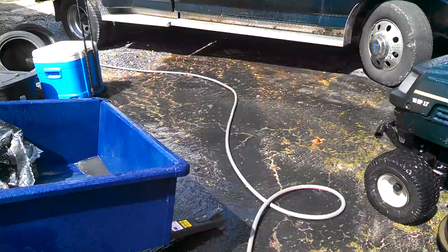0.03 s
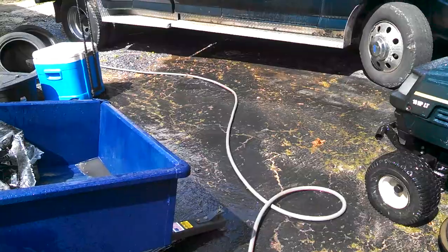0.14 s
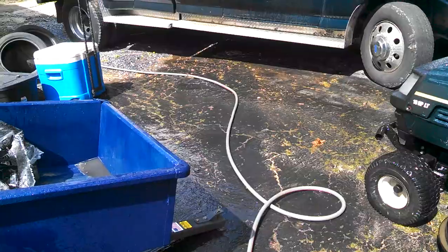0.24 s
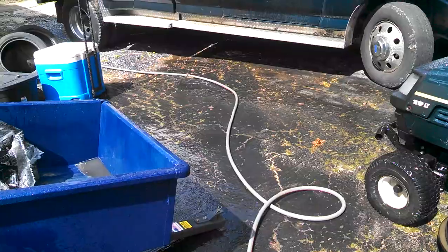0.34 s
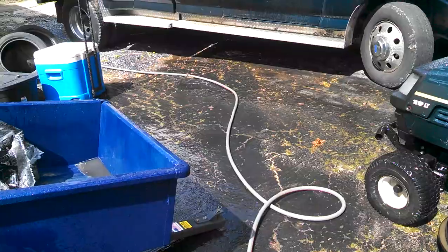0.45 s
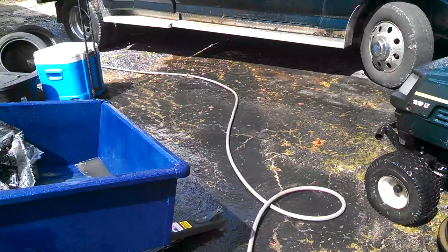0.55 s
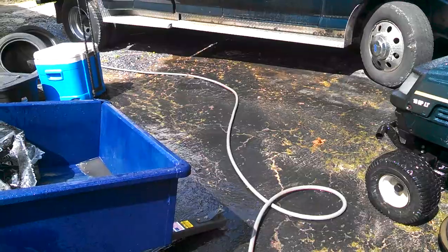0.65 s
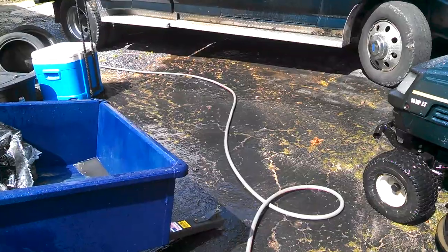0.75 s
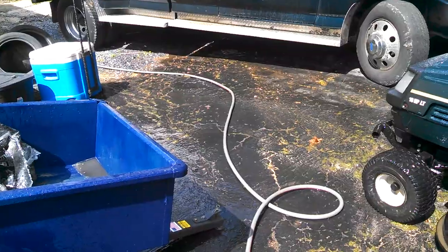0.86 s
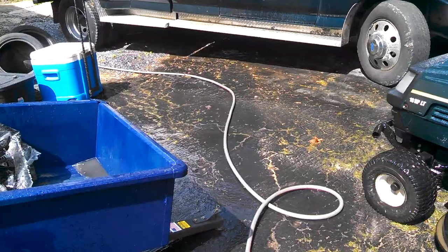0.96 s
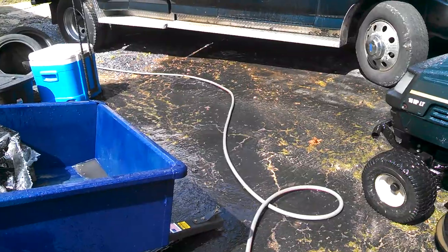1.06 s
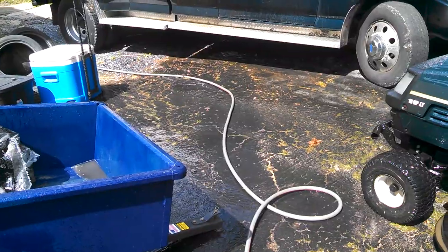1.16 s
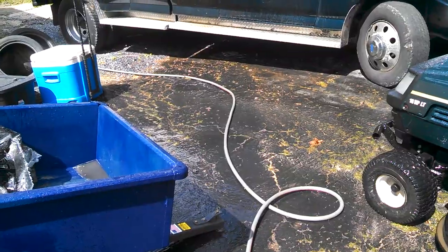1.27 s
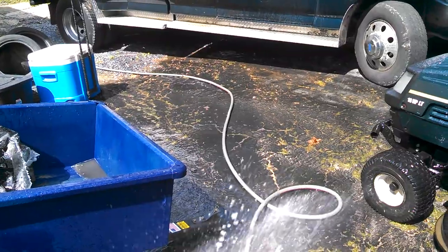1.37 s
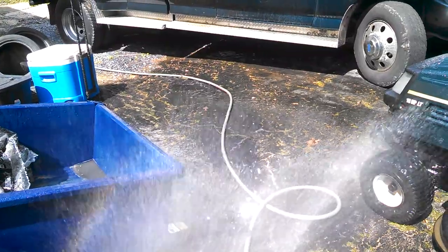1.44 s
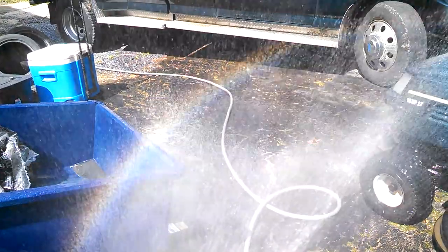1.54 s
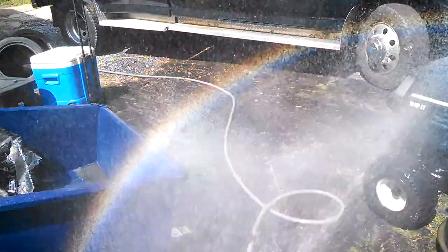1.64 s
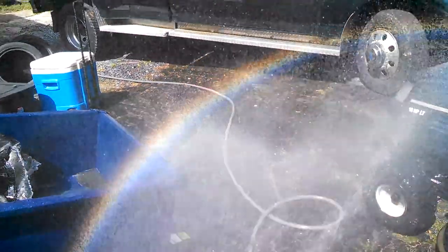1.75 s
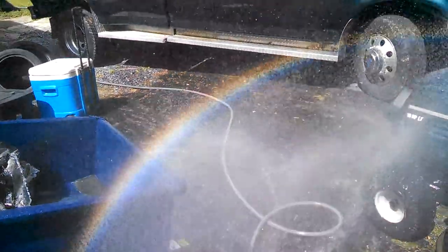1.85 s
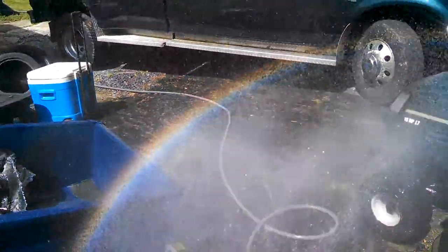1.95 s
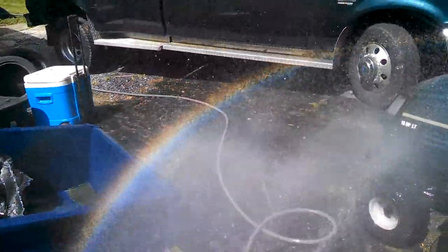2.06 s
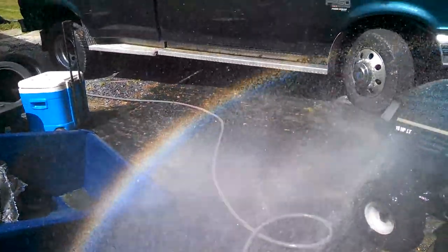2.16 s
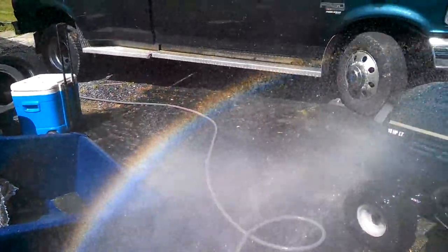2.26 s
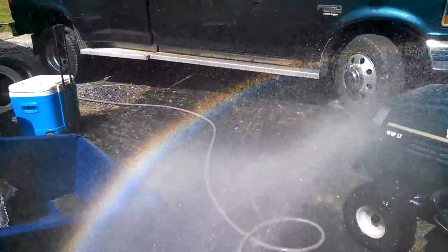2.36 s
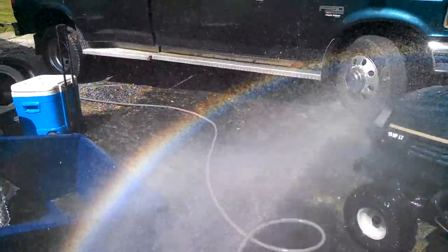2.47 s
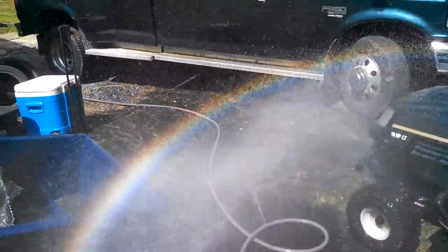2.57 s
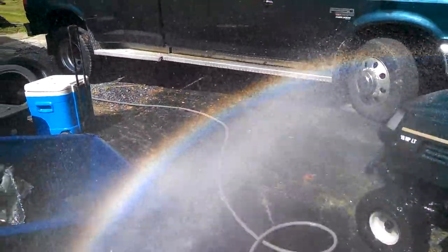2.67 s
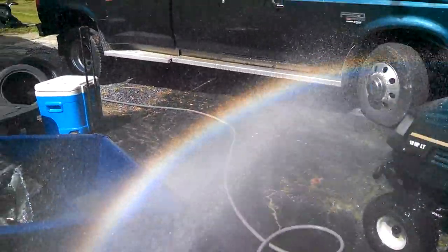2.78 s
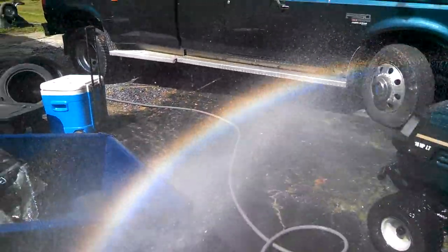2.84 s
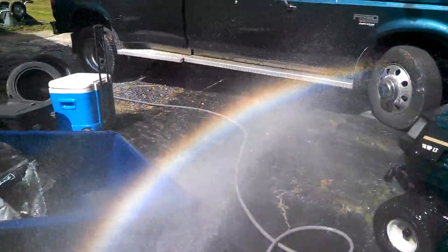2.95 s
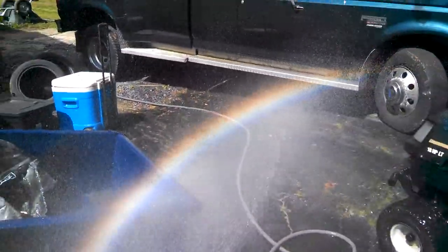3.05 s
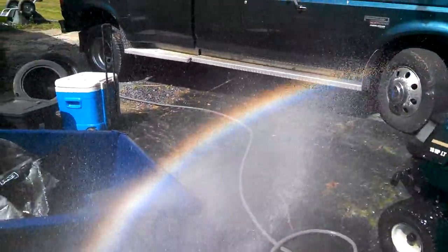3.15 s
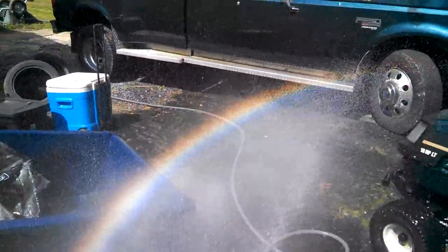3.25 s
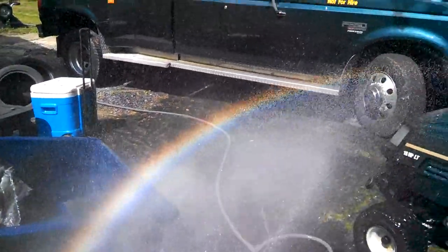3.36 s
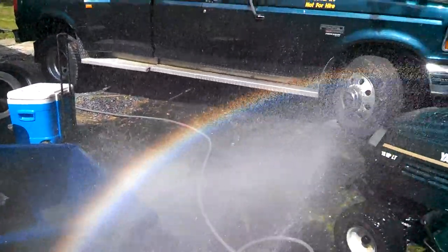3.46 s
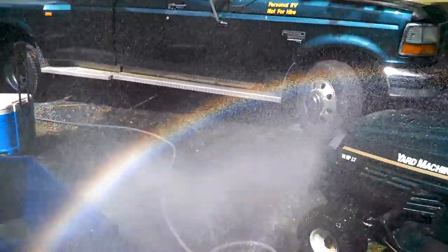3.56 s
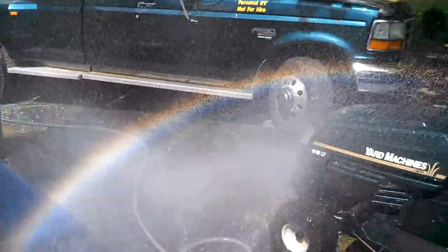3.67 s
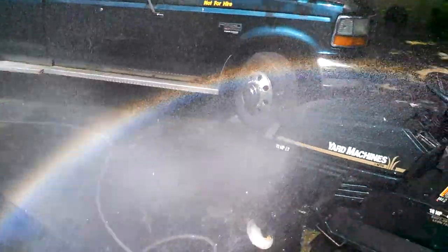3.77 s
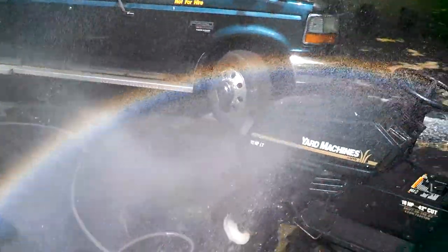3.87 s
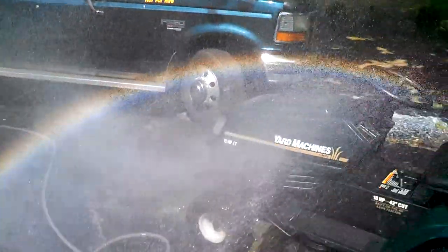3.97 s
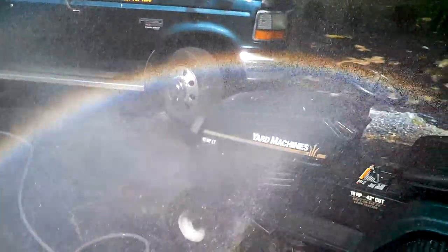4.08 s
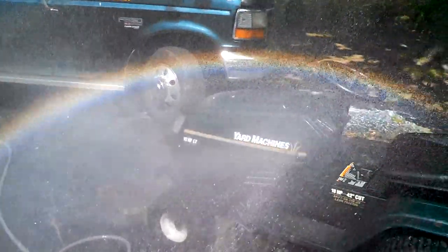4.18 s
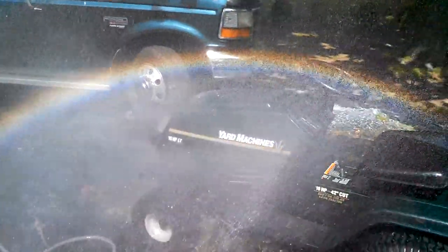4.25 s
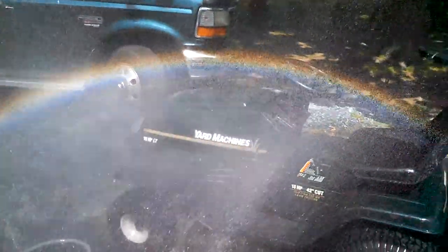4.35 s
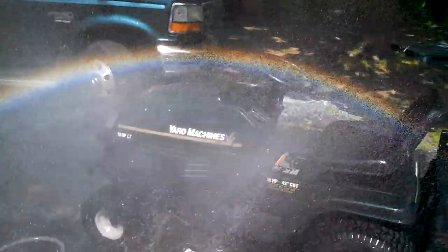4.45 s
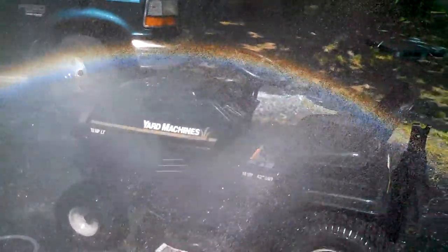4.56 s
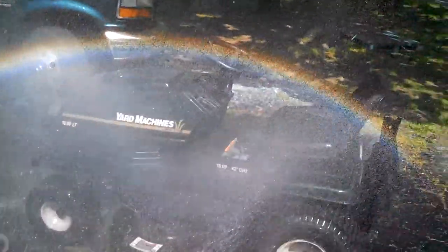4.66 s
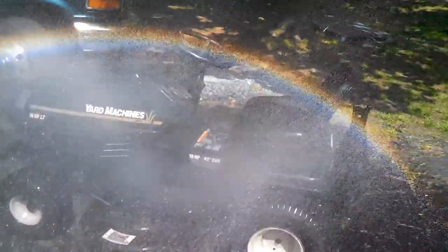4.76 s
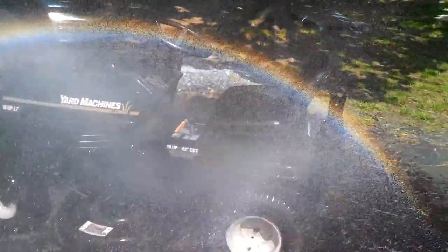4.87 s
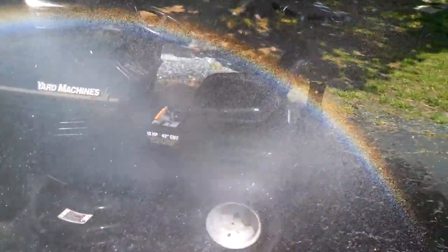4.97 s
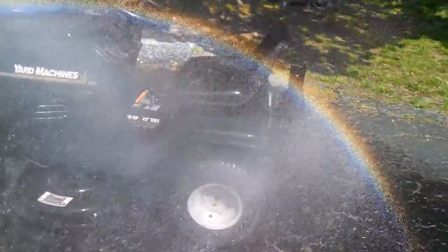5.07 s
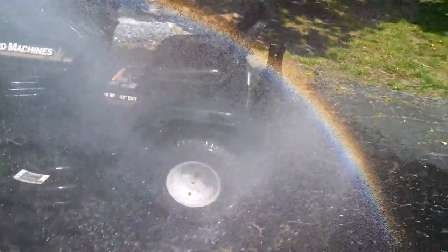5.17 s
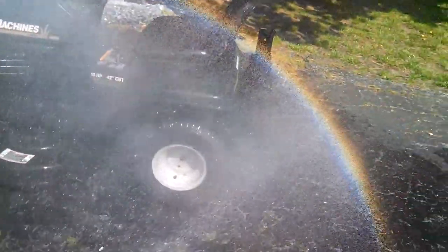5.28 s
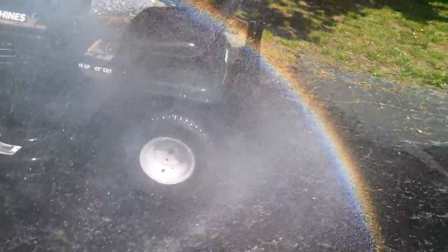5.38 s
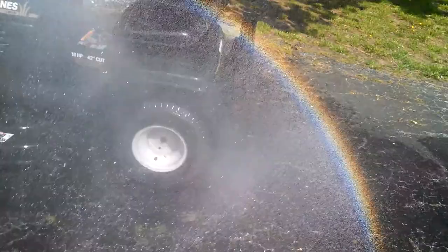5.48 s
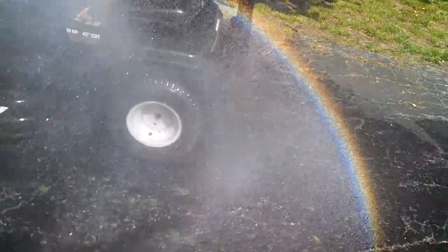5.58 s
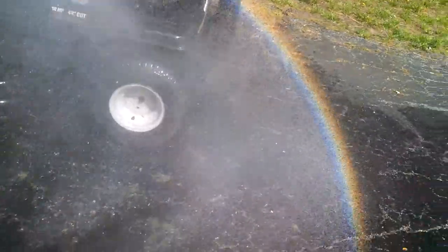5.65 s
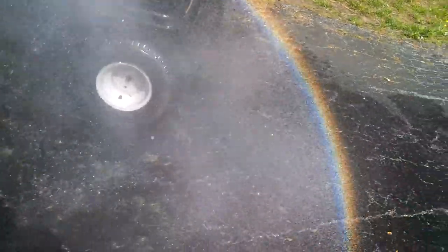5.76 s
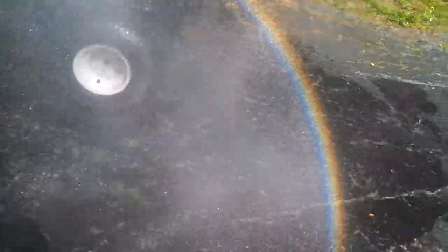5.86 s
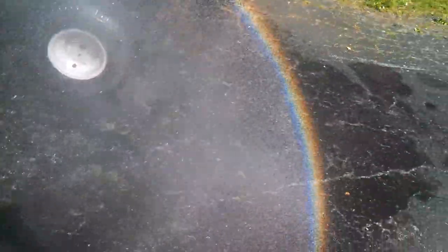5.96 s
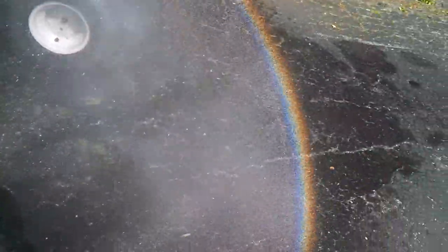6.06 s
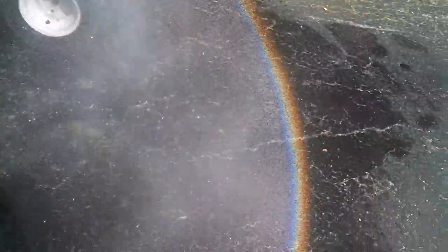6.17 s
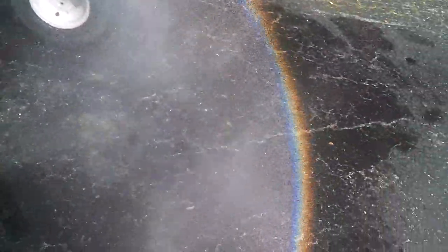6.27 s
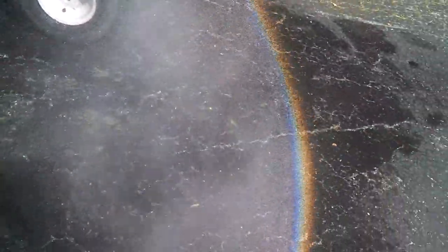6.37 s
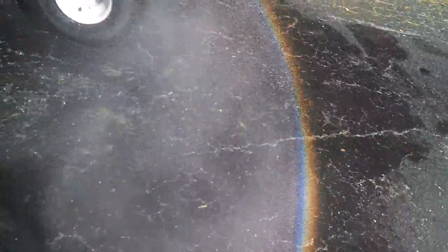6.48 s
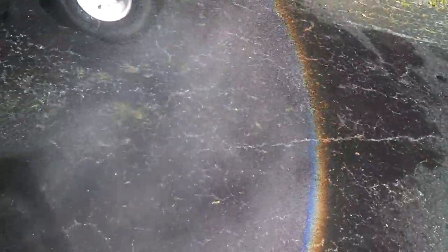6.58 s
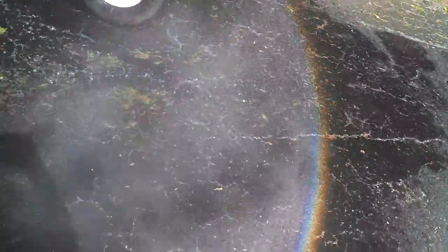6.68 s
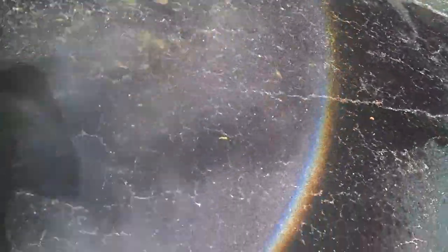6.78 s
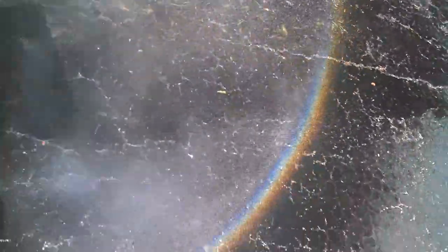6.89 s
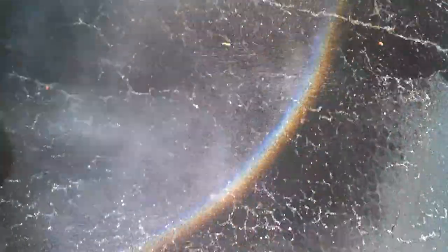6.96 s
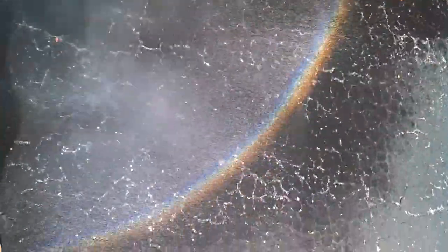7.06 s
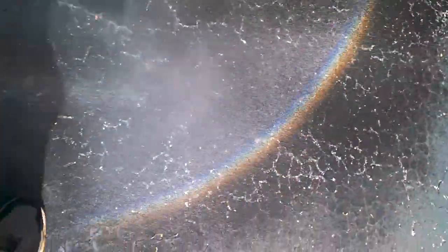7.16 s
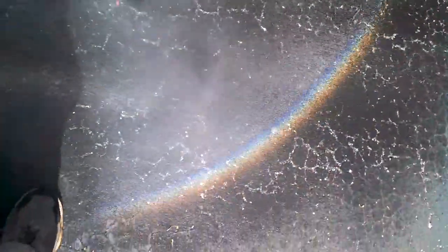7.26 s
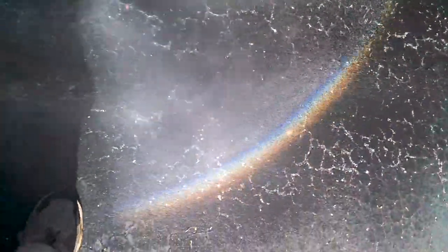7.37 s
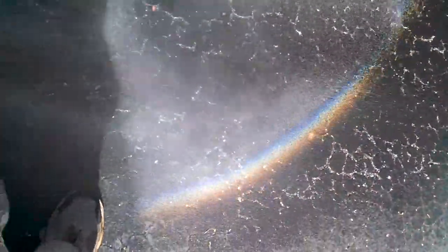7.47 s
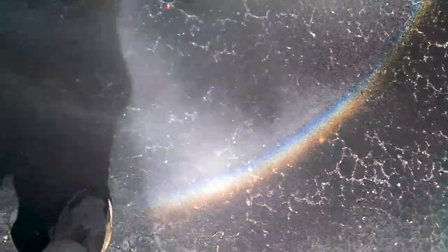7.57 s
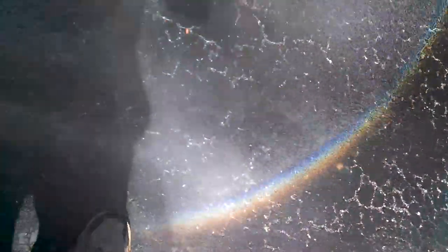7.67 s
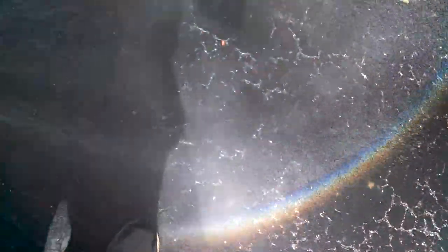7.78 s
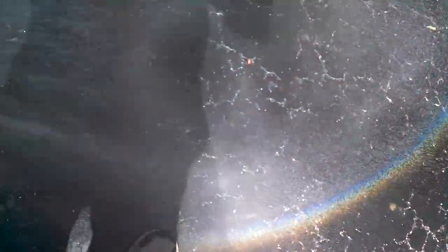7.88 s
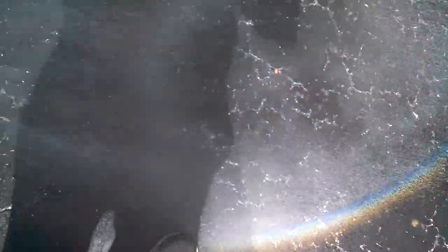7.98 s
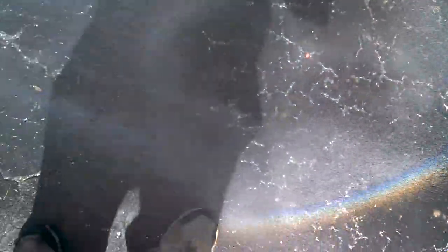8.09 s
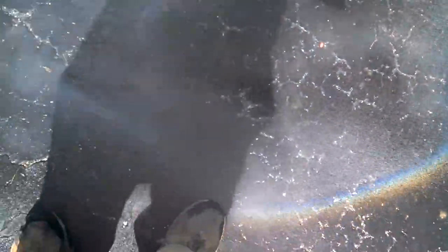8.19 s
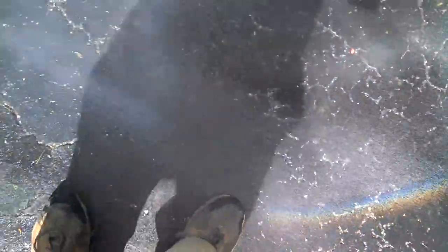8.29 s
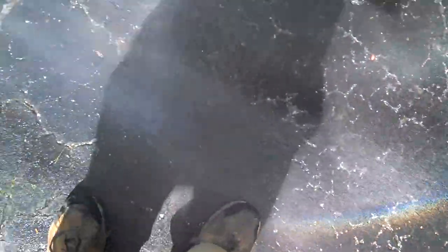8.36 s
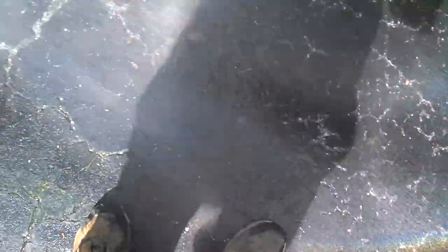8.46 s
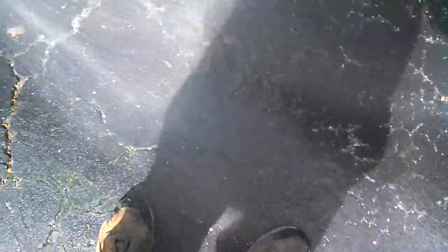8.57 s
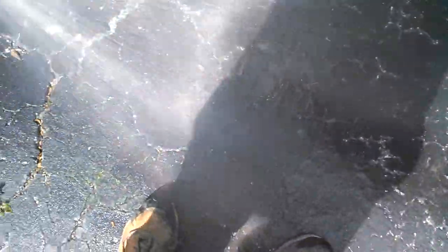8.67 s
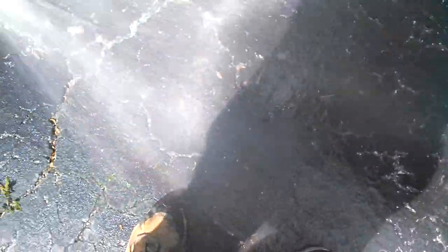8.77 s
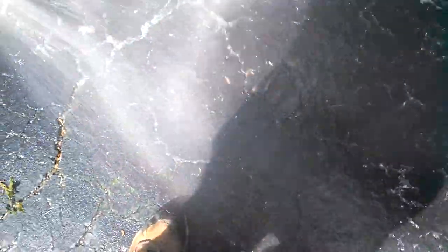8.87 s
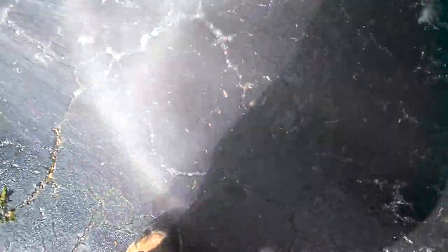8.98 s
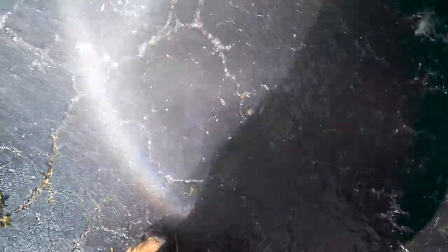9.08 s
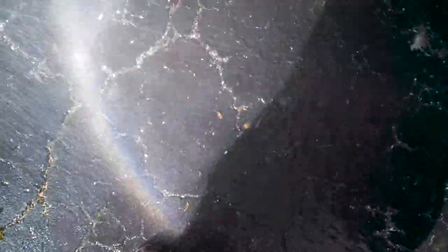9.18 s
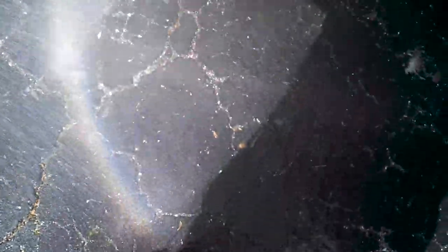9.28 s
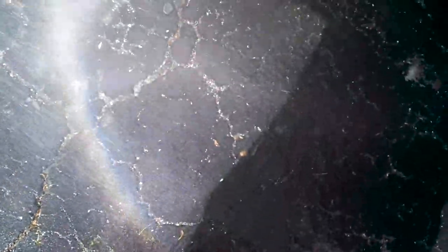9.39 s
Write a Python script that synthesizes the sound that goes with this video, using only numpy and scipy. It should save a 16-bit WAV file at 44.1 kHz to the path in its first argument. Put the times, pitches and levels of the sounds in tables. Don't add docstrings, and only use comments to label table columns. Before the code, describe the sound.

The first 0.8 seconds are silent. Then a faint outdoor rumble fades in quickly, with a low distant motor hum and a thin, very high electrical whine. Between about 0.85 and 1.25 seconds a distant bird gives several short, soft gliding whistles, slightly to one side. Near 1.38 seconds a hose valve sputters and chatters, jumps in strength at 1.44, and is fully open by 1.55. A close, broad water spray takes over: bright misty hiss, a lower rushing roar and drops pattering on wet asphalt. Automatic gain pulls it down around 1.7 to 1.9 seconds, then it climbs back by about 3. The spray continues steadily to the end near 9.4 seconds, with brief heavier gushes around 3.7, 5.2, 6 and 8 seconds, small level dips, and wide stereo colouring that shifts as the handheld camera turns.

```python
import sys
import numpy as np
from scipy import signal
from scipy.fft import rfft, irfft, next_fast_len
from scipy.io import wavfile
from scipy.ndimage import uniform_filter1d, map_coordinates

SR = 44100
rng = np.random.default_rng(int(sys.argv[2]) if len(sys.argv) > 2 else 0)


def volts_from_decibels(level):
    exponent = np.asarray(level, float) / 20
    return 10 ** exponent


def store_wav(level_fs):
    pcm = np.round(np.clip(np.atleast_2d(level_fs), -1, 1) * 32767)
    wavfile.write(sys.argv[1], SR, pcm.T.astype(np.int16))


N = 415863
T = np.arange(N) / SR
WIDEN_LAG = 16


def spray():
    # frequency in Hz, level in dB per Hz.
    roar_colour = [(25, 2), (50, -3), (95, 0), (200, -1), (400, 1), (600, -8), (900, -69), (1500, -120)]
    patter_colour = [(250, -120), (450, -4.5), (700, 0.5), (1000, 0.5), (1400, -0.5), (2000, 2),
                     (2800, 4.5), (3300, -1), (4000, -54), (5000, -120)]
    hiss_colour = [(1500, -120), (2200, -63), (3000, -6), (4000, -2.5), (5200, -1.5), (6800, -2.5),
                   (8300, -3.5), (10500, -20), (14000, -120)]
    mist_colour = [(5000, -120), (7000, 9), (8500, 0), (10000, 1.5), (12000, 0), (14000, 0.5),
                   (15500, -1.5)]
    # frequency in Hz, level against the near port in dB,
    # likeness to the near port from 0 to 1, phase lead in radians.
    far_port = [(50, 0, 0.92, .15), (100, -4, 0.98, 0.3), (260, -2, 0.85, 0.45), (405, -3.5, 1, 0.24),
                (620, -6.5, 0.77, 0.034), (960, -6.5, 1, 0.51), (1370, -5, 0.68, 0.51),
                (2150, -5.5, 0.72, 0.54), (3440, -1.5, 0.05, -0.14), (7900, -5, 0, 0.03),
                (15400, -4, 0.34, 0.062)]
    # time in seconds, far port's delay in ms,
    # directness of the far port's copy in dB, facing the jet in dB.
    turning = [(0, 0.34, -1.5, -2), (1.4, 0.29, -2.5, -2.5), (2.3, .32, -0.5, -1.5),
               (3.05, 0.356, -1, -2.5), (3.25, 0.33, -1, -1.8), (3.5, 0.33, -1, -1.1),
               (3.8, .355, -2.3, -0.3), (5, .4, 0.6, 0.2), (5.6, 0.42, -0.9, 1.6), (6.05, 0.45, 0.8, -0.5),
               (6.4, 0.43, 0.5, -0.8), (7, 0.46, .6, -0.45), (7.7, 0.43, .1, 1.5), (8.5, .42, -1, 1.3),
               (8.9, 0.45, -1.9, 0.2), (9.43, 0.42, 0, 0.3)]
    # time in seconds, flow in dB under full.
    valve = [
        (1.371, -45),
        (1.377, -19),
        (1.386, -17),
        (1.396, -13),
        (1.41, -13.5),
        (1.432, -11),
        (1.443, -1.5),
        (1.465, -5.5),
        (1.54, -.1),
    ]
    lag_ms, direct_db, beam_db = curves(turning)
    flow_db, = curves(valve)
    throttle = np.clip(-flow_db, 0, 20)
    body_loss_db = 0.93 * throttle
    body_beam_db = 0.067 * beam_db
    to_ground_db = 10.5 * (lag_ms - lag_ms.min())
    gush_db = splashes()
    surge_db = 0.3 * wobble(14) + 0.25 * wobble(45) + 0.15 * wobble(4) + chatter()

    roar = levelled(at_ports(drops(200, 2.1), roar_colour, far_port, patchy_db=0.7))
    patter = levelled(at_ports(drops(400, 1.8), patter_colour, far_port, patchy_db=1.08))
    hiss = levelled(at_ports(drops(800, 1.34), hiss_colour, far_port, patchy_db=0.62))
    mist = levelled(at_ports(drops(1000, 1.7), mist_colour, far_port, patchy_db=-2.5))

    patter_db = -37 + gush_db + 0.98 * beam_db + to_ground_db - body_loss_db + 0.38 * wobble(7.9)
    hiss_db = -29.5 + beam_db
    mist_db = -29 + body_beam_db + 0.47 * throttle + 0.44 * wobble(6.8)
    roar_db = -42 + 0.65 * gush_db + body_beam_db - body_loss_db + 0.5 * wobble(8)

    bright = volts_from_decibels(patter_db) * patter + volts_from_decibels(hiss_db) * hiss + volts_from_decibels(mist_db) * mist
    jet = shaded(bright, lag_ms) + volts_from_decibels(roar_db) * roar
    return heard(volts_from_decibels(flow_db + surge_db) * jet, lag_ms, direct_db)


def splashes():
    # time in seconds, extra level in dB.
    gushes = [
        (3.17, 1.5),
        (3.241, 1),
        (3.672, 3),
        (5.2, 2),
        (5.97, 3.5),
        (6.11, 3),
        (6.86, 1),
        (7.24, 1.5),
        (7.97, 2.5),
        (8.46, -1),
    ]
    s, db = np.transpose(gushes)[:, :, None]
    width_s = 0.016
    return (db * np.exp(-.5 * ((T - s) / width_s) ** 2)).sum(axis=0)


def chatter():
    since = T - 1.3795
    rate_hz, fade_s, depth_db = 135, 0.03, 6
    return depth_db * np.exp(-np.abs(since) / fade_s) * np.cos(2 * np.pi * rate_hz * since)


def drops(per_s, size):
    struck = rng.random((2, N)) < per_s / SR
    return rng.standard_normal((2, N)) * (1 + size * struck)


def shaded(rows, lag_ms):
    # start in seconds, end in seconds,
    # cycles in the far port's delay, width in Hz, depth in dB (negative lifts).
    sliding = [
        (2.1, 7.3, 5.15, 1100, 2),
        (3.8, 6.9, 6.05, 480, 1),
        (1, 6.2, 4.07, 350, -2),
        (5.76, 6.94, 0.534, 120, 6),
    ]
    # start in seconds, end in seconds, centre in Hz, width in
    # Hz, depth in dB (negative lifts).
    staying = [(7.34, 8.6, 9840, 250, 6), (5.7, 6.4, 7980, 490, 5), (7.1, 8.8, 8270, 520, 3.5),
               (5.7, 6.96, 9500, 250, 7), (1.2, 2.5, 7000, 420, 3.5), (3.5, 3.3, 14000, 550, 0),
               (2.9, 9, 7110, 247, 4), (6.15, 12, 2880, 160, 9), (4.2, 4.95, 730, 130, 2),
               (6.46, 12, 830, 160, -4), (7.4, 11, 1700, 85, 5.5), (8.2, 7.6, 13700, 900, -5.5),
               (6.93, 8.76, 5750, 540, 3.5), (8.1, 9.6, 4600, 320, 3.5), (7.1, 8.5, 1000, 114, 5.5),
               (2.9, 6, 1340, 54, 3.5), (6.47, 6.73, 3030, 160, 16), (4.2, 5.2, 15500, 300, 9),
               (1.2, 2.3, 14300, 500, -1), (8.4, 8.8, 6310, 570, 2.4), (3.6, 5.2, 2880, 250, -3),
               (1.2, 3.5, 2770, 260, 2.4), (5.7, 6.8, 13600, 350, 2), (7.5, 8.7, 2000, 160, -1.5)]
    hz, t, z = signal.stft(rows, SR, nperseg=512)
    one_cycle_hz = 1000 / np.interp(t, T, lag_ms)
    dips = [(a, b, cycles * one_cycle_hz, w, db) for a, b, cycles, w, db in sliding] + staying
    shift_s = 0.72
    loss_db = np.zeros(z.shape[1:])
    for start, end, centre_hz, width_hz, depth_db in dips:
        there = np.clip(np.minimum(t - start, end - t) / shift_s + .5, 0, 1)
        loss_db += depth_db * there * np.exp(-.5 * ((hz[:, None] - centre_hz) / width_hz) ** 2)
    return signal.istft(z * volts_from_decibels(-loss_db), SR, nperseg=512)[1][:, :N]


def bird():
    # start in seconds, end in seconds, start pitch in Hz, end pitch in Hz, level in dB.
    whistles = [
        (.9, .99, 2380, 2350, -75),
        (.985, 1.05, 2620, 2950, -68),
        (1.05, 1.13, 2850, 2950, -71),
        (1.06, 1.17, 2200, 2120, -76),
        (1.19, 1.225, 3300, 3220, -70),
        (.83, .875, 4250, 4250, -83),
        (1.21, 1.25, 4300, 4200, -85),
    ]
    out = np.zeros(N)
    for start, end, from_hz, to_hz, db in whistles:
        u = np.clip((T - start) / (end - start), 0, 1)
        level = volts_from_decibels(db + 16) * np.sin(np.pi * u)
        pitch = from_hz + (to_hz - from_hz) * u
        out += level * np.sin(2 * np.pi * np.cumsum(pitch) / SR)
    return out * volts_from_decibels([[-6], [1.5]])


def whine():
    # start pitch in Hz, end pitch in Hz, pitch wander in Hz, level in dB, far port's excess in dB.
    tones = [
        (14760, 14808, 2.5, -48, .3),
        (93.5, 94, 1.2, -46, 2.2),
        (122, 121, 2.5, -55, 2.2),
    ]
    out = np.zeros((2, N))
    for start_hz, end_hz, wander_hz, db, tilt_db in tones:
        pitch = np.linspace(start_hz, end_hz, N) + wander_hz * wobble(5)
        sag_db = 7 * sag() * (start_hz > SR / 20)
        level = volts_from_decibels(db - sag_db + 1.4 * wobble(2.27))
        tone = level * np.sin(2 * np.pi * np.cumsum(pitch) / SR)
        out += tone * volts_from_decibels([[-1.5], [0.5 + tilt_db]])
    return out


def yard():
    # frequency in Hz, level in dB per Hz.
    air_colour = [(25, -3), (60, -1), (130, -10), (250, -12.5), (450, -14), (700, -25.5), (1500, -33),
                  (3000, -32.5), (6000, -44), (10000, -39.5), (15500, -43)]
    # frequency in Hz, level against the near port in dB,
    # likeness to the near port from 0 to 1, phase lead in radians.
    air_ports = [(50, -.2, 1, .05), (100, -.2, 1, 0.11), (450, -.2, 0.94, 0.43), (750, -.2, 0.29, 1.1),
                 (2000, -.2, 0.16, 3.9), (15000, -.2, 0.19, 3)]
    air = at_ports(rng.standard_normal((2, N)), air_colour, air_ports, patchy_db=1.5)
    level_db = -44.5 - 11 * sag() + 0.6 * wobble(11)
    return volts_from_decibels(level_db) * heard(levelled(air), 0, 0)


def sag():
    from_s, over_s = 1.9, 1.3
    return np.clip((T - from_s) / over_s, 0, 1)


def at_ports(source, spectrum, ports, patchy_db):
    z = signal.stft(source, nperseg=512)[2]
    field = uniform_filter1d(rng.standard_normal(z.shape[1:]), 6, 0)
    field = uniform_filter1d(field, 12, 1)
    patchy = z * volts_from_decibels(patchy_db * field / field.std())
    pair = signal.istft(patchy, nperseg=512)[1][:, :N]
    m = next_fast_len(N + 8192)
    hz = np.fft.rfftfreq(m, 1 / SR)
    near, other = rfft(pair, m) * volts_from_decibels(along(spectrum, hz)[0])
    shade_db, alike, lead = along(ports, hz)
    alike = np.clip(alike, 0, 1)
    copy = volts_from_decibels(shade_db) * alike * np.exp(1j * lead) * near
    apart = volts_from_decibels(shade_db) * np.sqrt(1 - alike ** 2) * other
    return irfft(np.array([near, copy, apart]), m)[:, :N]


def heard(rows, lag_ms, direct_db):
    far_copy = volts_from_decibels(direct_db) * later(rows[1], lag_ms)
    scatter = volts_from_decibels(-1.5 * direct_db - 1.0) * rows[2]
    return np.array([rows[0], far_copy + scatter])


def later(x, ms):
    return map_coordinates(x, [np.arange(N) - ms * SR / 1000], mode="nearest")


def levelled(rows):
    pair = np.array([rows[0], np.roll(rows[1], WIDEN_LAG) + rows[2]])
    return rows / widen(pair).mean(axis=0).std()


def widen(ports):
    return ports - np.pad(ports[::-1], ((0, 0), (WIDEN_LAG, 0)))[:, :N]


def along(points, hz):
    f, *cols = np.transpose(points)
    return [np.interp(np.log(hz + 1), np.log(f + 1), c) for c in cols]


def curves(rows):
    s, *cols = np.transpose(rows)
    return [np.interp(T, s, c, left=-140) for c in cols]


def wobble(rate):
    return map_coordinates(rng.standard_normal(int(N * rate / SR) + 4), [T * rate])


def gain_control():
    # time in seconds, drop in dB under full gain.
    ducks = [(.78, 22), (1.7, 13), (1.92, 11.5), (2.78, 4.5), (3.33, 2), (3.5, 3), (3.81, 3.5), (4.99, 2),
             (5.241, 3), (5.53, 3), (6.01, -1.3), (6.15, 0.6), (6.54, 1), (6.89, 3), (7.27, 2), (7.65, 2.5),
             (8.688, 2.5), (8.91, 4), (9.21, 3.5)]
    s, depth_db = np.transpose(ducks)[:, :, None]
    climb_db_per_s, smooth_s = 10, 0.03
    climbs = np.where(T > s, climb_db_per_s * (T - s) - depth_db, 0)
    gain_db = uniform_filter1d(np.minimum(climbs.min(axis=0), 0), round(smooth_s * SR))
    start_s, fade_in_s = 0.822, 0.012
    return volts_from_decibels(gain_db) * np.clip((T - start_s) / fade_in_s, 0, 1) ** 2


def scene():
    return spray() + yard() + bird() + whine()


def roll_off(x):
    return signal.sosfilt(signal.butter(12, 15670, fs=SR, output="sos"), x)


def record(dry):
    # frequency in Hz, level in dB.
    mic = [(25, -21), (40, 3.5), (60, -2), (90, 1.9), (2300, 0.36), (3000, -0.5), (3800, -0.03), (6300, 2),
           (7200, -3.5), (8500, 1.9), (13000, 1.1), (15000, -1.5)]
    top_hz = 15480
    m = next_fast_len(N + 8192)
    hz = np.fft.rfftfreq(m, 1 / SR)
    response = (hz < top_hz) * volts_from_decibels(along(mic, hz)[0])
    band = irfft(rfft(dry * gain_control(), m) * response, m)[:, :N]
    mix = widen(band) * volts_from_decibels([[-.55], [.55]]) * (T > .82)
    return roll_off(mix)


dry = scene()
out = record(dry)
store_wav(out)
```